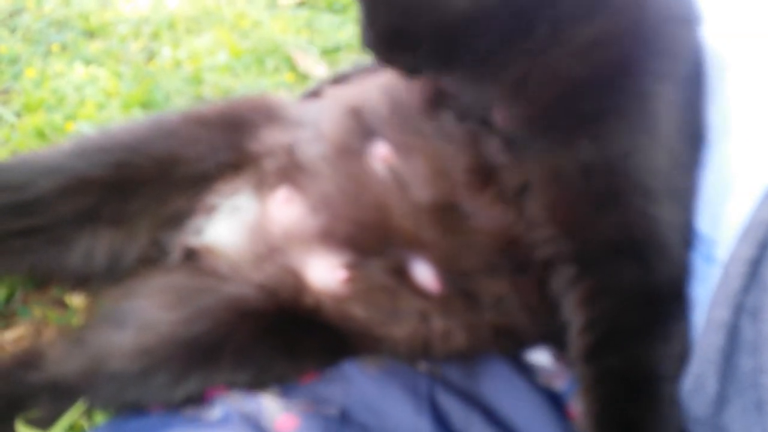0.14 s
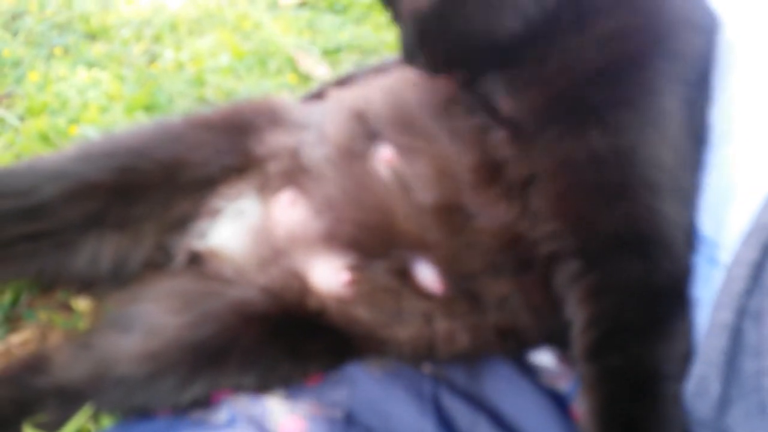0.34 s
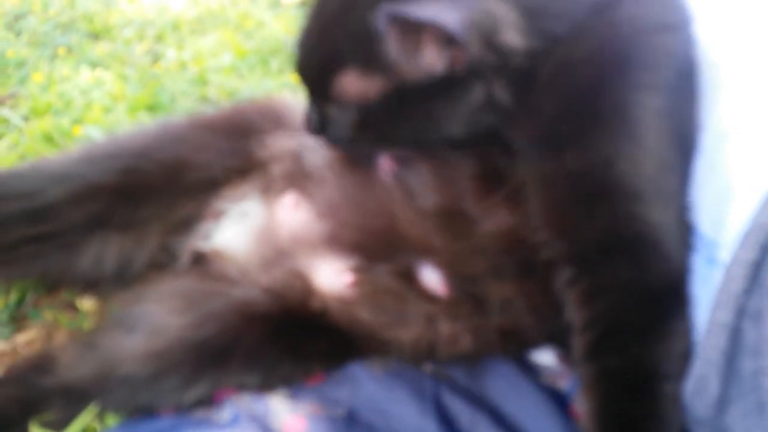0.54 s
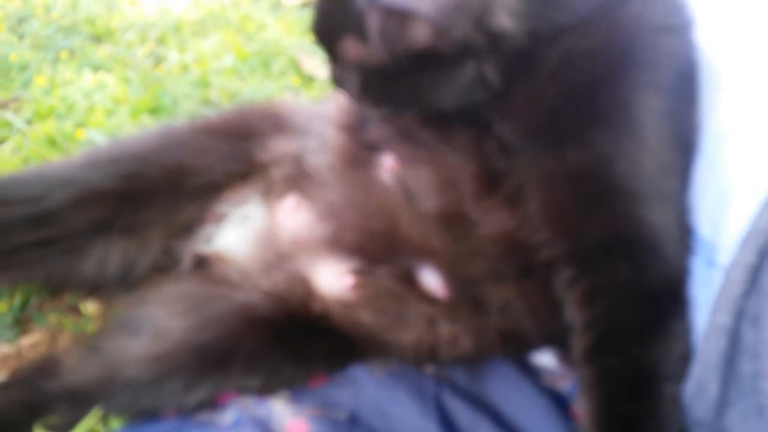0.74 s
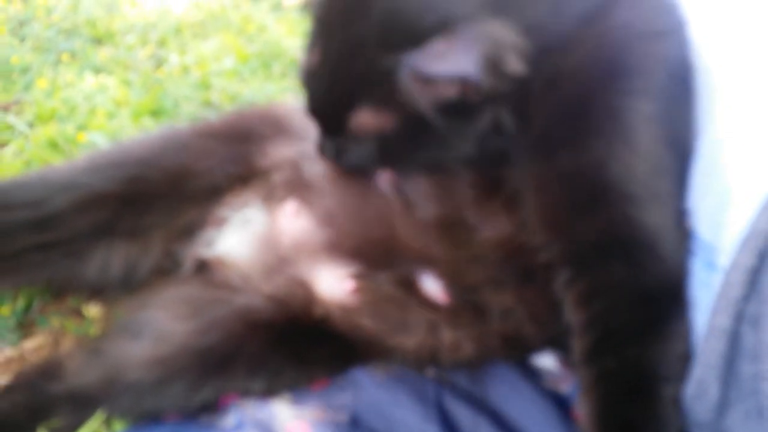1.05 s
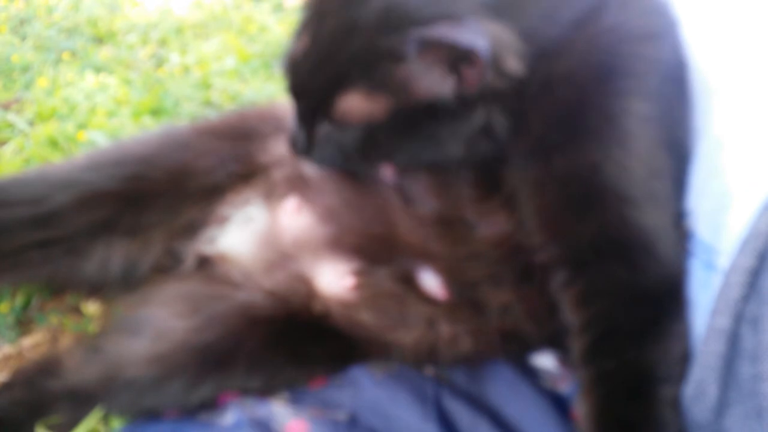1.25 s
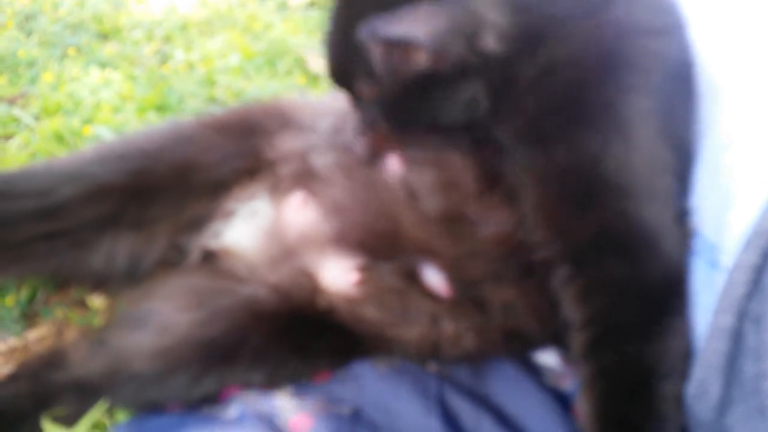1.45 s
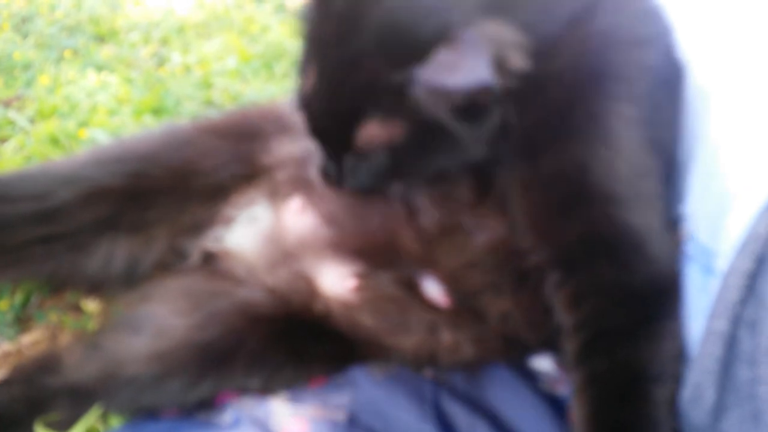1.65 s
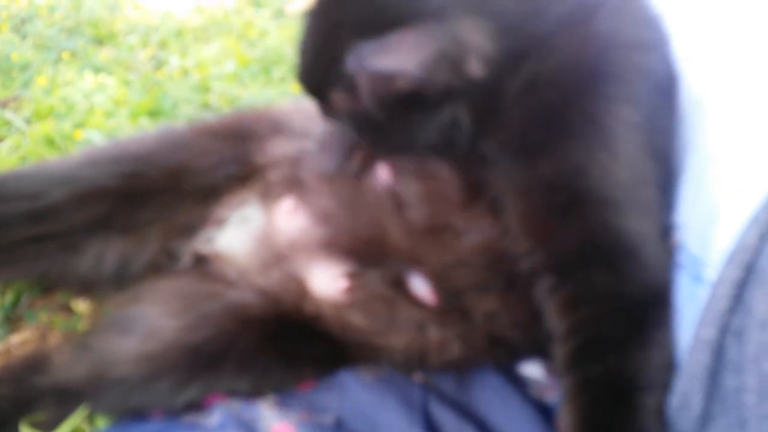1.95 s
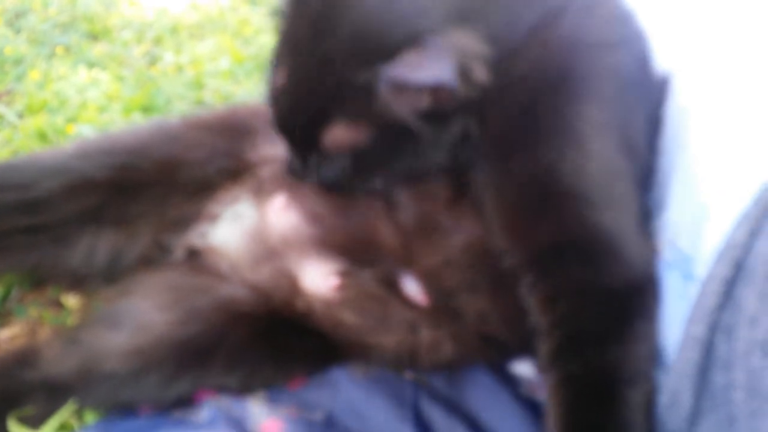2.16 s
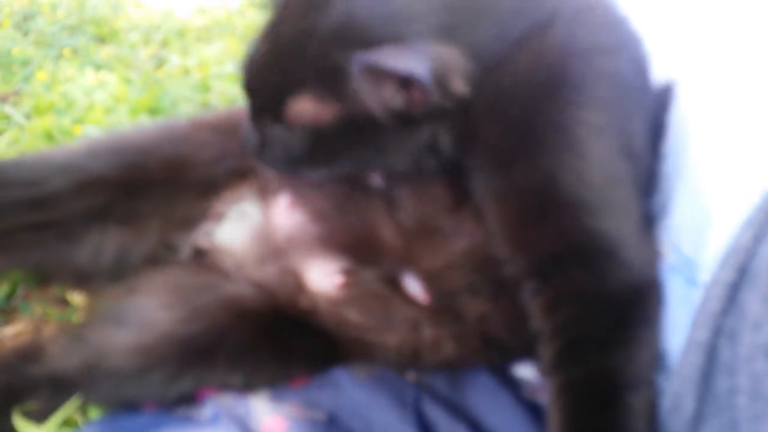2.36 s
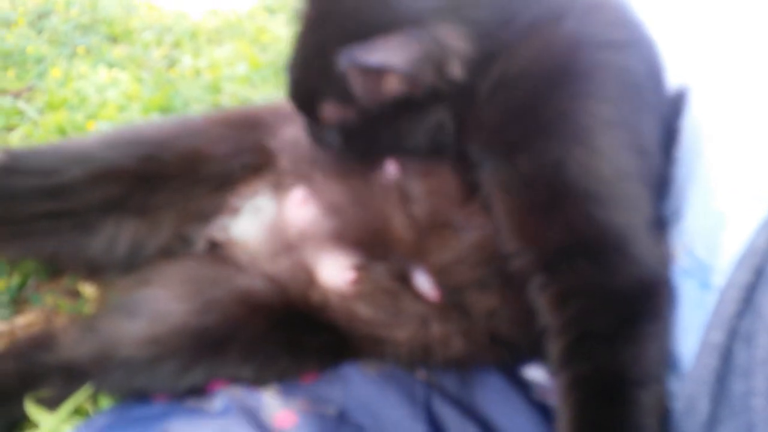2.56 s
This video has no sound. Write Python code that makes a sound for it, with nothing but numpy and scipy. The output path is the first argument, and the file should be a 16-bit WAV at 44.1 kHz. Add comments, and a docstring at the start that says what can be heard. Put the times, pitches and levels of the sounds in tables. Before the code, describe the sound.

A motor with a fan hums low, then revs up to a higher, louder steady roar outdoors

```python
"""A garden outdoors: a motor with a four-bladed fan runs near a small stereo microphone.
It idles, is revved up, overshoots and holds the higher speed. Sines give the blade and shaft tones
and a whine; filtered noise gives the low roar, air hiss, whistle and faint top treble, and bands of
noise swell for a while. Struck resonators give the faint pings of a small piece of metal."""
import sys
import numpy as np
from scipy import signal
from scipy.fft import rfft, irfft, next_fast_len
from scipy.io import wavfile

SR = 44100
rng = np.random.default_rng(int(sys.argv[2]) if len(sys.argv) > 2 else 0)


def elevation(decibels):
    """Turn decibel levels (scalar or array-like) into linear amplitude ratios."""
    levels = np.asarray(decibels, float)
    return 10 ** (levels / 20)


def materialize(psi):
    """Save the field psi as 16-bit PCM at rate SR to the path in sys.argv[1].

    A 1-D psi becomes a single channel; in a 2-D psi each row is a channel.
    """
    bounded = np.clip(np.atleast_2d(psi).T, -1, 1)
    quanta = np.round(bounded * 32767).astype(np.int16)
    wavfile.write(sys.argv[1], SR, quanta)


N = 119070

# motor speed and its two main tones: start_s, blade_hz, blade_db, shaft_db
MOTOR_SPEED = [(0, 182.7, -39.5, -38), (.45, 181, -33, -42), (.8, 186.9, -30.5, -51),
               (1.0, 192.1, -25.5, -67), (1.18, 239.5, -33, -31), (1.33, 266, -36, -30.5),
               (1.48, 254.4, -28.5, -43), (1.8, 254.8, -24.5, -35.5), (2.35, 256, -20, -36),
               (2.6, 258.3, -20.5, -47), (2.7, 252.7, -23, -51)]
# loudness of the motor's noise: start_s, roar_db (before the roar's trim), hiss_db (before its flutter)
MOTOR_LOAD = [(0, -25.5, -48), (.5, -24, -47.5), (1.02, -22.5, -47), (1.3, -17, -40), (1.5, -19, -42.5),
              (1.9, -19, -41), (2.3, -19, -42.5), (2.52, -18.5, -41.5), (2.7, -20, -41.5)]


def rms_one(x):
    """Normalization: divides a signal by its root mean square."""
    return x / np.sqrt(np.mean(x ** 2) + 1e-20)


def in_time(rows):
    """Linear interpolation: turns each column after the times into a curve over the samples."""
    start_s, *columns = np.transpose(rows)
    return [np.interp(np.arange(N) / SR, start_s, column) for column in columns]


def at_hz(points, hz):
    """Spectral envelope: interpolates the second column along log frequency."""
    point_hz, values = np.transpose(points)
    return np.interp(np.log(hz), np.log(point_hz), values)


def pan(db):
    """Interaural level difference: gains for left and right that differ by db, left minus right."""
    return elevation(np.array([[.5], [-.5]]) * db)


def drift(rate_hz):
    """Random modulation: white noise through a two-pole low-pass with equal poles, rms about 1."""
    hop = 40  # samples between computed values
    settle = 2000  # values dropped while the filter settles
    pole = np.exp(-2 * np.pi * rate_hz * hop / SR)
    white = rng.standard_normal(N // hop + settle + 2)
    slow = signal.lfilter([1], [1, -2 * pole, pole * pole], white)[settle:]
    return np.interp(np.arange(N) / hop, np.arange(len(slow)), rms_one(slow))


def stereo_noise(spectrum, left_lead_s=0):
    """Partial coherence: coloured noise alike in both ports in the bass, unrelated in the treble; mid rms 1."""
    # coherence of the two ports: frequency_hz, left_right_likeness (clipped to 0-1 once interpolated)
    likeness = [(60, 0.97), (110, 1), (210, 0.94), (390, 1), (730, 0.67), (1360, 0.08), (2530, 0.19),
                (4730, -1.3), (8820, -0.55)]
    # the two microphone ports differ in colour: frequency_hz, left_minus_right_db
    ports = [(60, 0), (230, 0.4), (400, 3), (600, 2.5), (900, 11.5), (1400, 5), (1900, -0.5), (2400, 2.5),
             (3300, 4), (5000, 2), (6500, 4), (7200, 6), (7900, -5.5), (9600, -13), (11000, 6.5)]
    sign = np.array([[1], [-1]])
    size = next_fast_len(N)
    hz = np.maximum(np.arange(size // 2 + 1) * SR / size, 1)
    mid, side = rfft(rng.standard_normal((2, size)))
    alike = np.clip(at_hz(likeness, hz), 0, 1)
    pair = mid + np.sqrt((1 - alike) / (1 + alike)) * side * sign
    # a time lead is a phase that grows with frequency, shared between the ports
    pair = pair * np.exp(1j * np.pi * hz * left_lead_s * sign)
    colour = elevation(at_hz(spectrum, hz)) * pan(at_hz(ports, hz))
    out = irfft(pair * colour, size)[:, :N]
    return out / np.std(out.mean(axis=0))


def narrow_noise(hz, width_hz, evenness=0):
    """Quadrature modulation: low-passed noise on a carrier makes a band round its pitch; rms 1.
    Evenness (0-1) is the share of the level fluctuation, in dB, that is taken out."""
    sos = signal.butter(2, width_hz / 2, fs=SR, output="sos")
    in_phase, quadrature = signal.sosfilt(sos, rng.standard_normal((2, N)))
    phase = 2 * np.pi * np.cumsum(hz * np.ones(N)) / SR
    band = in_phase * np.cos(phase) + quadrature * np.sin(phase)
    envelope = np.hypot(in_phase, quadrature) + 1e-9
    return rms_one(band / envelope ** evenness)


def tone(hz, db):
    """Phase accumulation: a sine of moving pitch and rms level, with a random starting phase."""
    phase = 2 * np.pi * (np.cumsum(hz) / SR + rng.random())
    return np.sqrt(2) * elevation(db) * np.sin(phase)


def motor_tones():
    """Rotational tones: blades pass at four times the shaft rate; weaker multiples follow the blade tone."""
    # multiples of the shaft rate: multiple
    multiples = [8, 12]
    # their levels: level_db (relative to the blade tone)
    multiple_levels = [-23.5, -30.5]
    blades = 4
    blade_hz, blade_db, shaft_db = in_time(MOTOR_SPEED)
    shaft_hz = blade_hz / blades
    tones = tone(blade_hz, blade_db) + tone(shaft_hz, shaft_db)
    for multiple, level_db in zip(multiples, multiple_levels):
        tones = tones + tone(shaft_hz * multiple, blade_db + level_db)
    return tones * pan(2)


def roar():
    """Turbulence noise: its low spectrum crossfades in power from idle to fast with the speed."""
    # colour at idle: frequency_hz, density_db (relative, per hertz)
    idle_spectrum = [(15, -35), (25, -20), (48, -3.5), (70, -12), (124, -6), (153, -7), (185, -2.5),
                     (249, -12.5), (352, -9), (465, -25), (625, -28), (1600, -38.5), (2080, -79),
                     (3520, -120)]
    # colour at the higher speed: frequency_hz, density_db (relative, per hertz)
    fast_spectrum = [(15, -89), (25, -30), (48, -13), (86, -14), (188, -1), (253, -8.5), (286, -10.5),
                     (358, -7), (449, -12), (625, -20), (670, -24.5), (1490, -38), (2080, -63.5),
                     (3520, -120)]
    trim_db = -1.5
    blade_hz = in_time(MOTOR_SPEED)[0]
    roar_db = in_time(MOTOR_LOAD)[0]
    slowest_hz = blade_hz.min()
    fast_share = np.clip((blade_hz - slowest_hz) / (blade_hz[-1] - slowest_hz), 0, 1)
    idle = np.sqrt(1 - fast_share) * stereo_noise(idle_spectrum, left_lead_s=-0.00021)
    fast = np.sqrt(fast_share) * stereo_noise(fast_spectrum, left_lead_s=.00003)
    return elevation(roar_db + trim_db) * (idle + fast)


def hiss():
    """Broadband flow noise: air hiss under a slight random amplitude modulation."""
    # colour of the hiss: frequency_hz, density_db (relative, per hertz)
    hiss_spectrum = [(800, -33), (1400, -12), (1900, 2), (2320, -4), (3190, -3), (4070, -6), (5630, -6),
                     (6300, -4), (7800, -3.5), (9000, -17), (10000, -25), (11500, -37), (16000, -98)]
    flutter_db = .5 * drift(33.0)  # rate in Hz
    return elevation(in_time(MOTOR_LOAD)[1] + flutter_db) * stereo_noise(hiss_spectrum)


def whistle():
    """Narrow-band noise: a hiss of wandering centre pitch, mostly on the right."""
    # path of the whistle: start_s, centre_hz, level_db
    whistle_path = [(0, 7880, -57), (.3, 8320, -61), (.62, 8200, -61), (.8, 8840, -63), (1.1, 9260, -62.5),
                    (1.2, 7900, -58), (1.38, 7840, -49), (1.55, 7590, -56.5), (2.7, 7670, -53.5)]
    centre_hz, level_db = in_time(whistle_path)
    return elevation(level_db) * narrow_noise(centre_hz, width_hz=520) * pan(-14)


def swells():
    """Amplitude envelopes: each noise band of the motor rises to its peak and falls on a squared sine."""
    # bands: centre_hz, width_hz, left_minus_right_db, start_s, peak_s, end_s, peak_db
    swell_bands = [(200, 50, 0.8, 1.0, 2.08, 3.1, -19), (125, 20, .6, -.3, .2, 0.9, -29),
                   (385, 90, 8, 1.25, 1.58, 2.32, -28), (350, 11, -7, 2.1, 2.4, 3.3, -29.5),
                   (1944, 300, -9, 1.2, 1.66, 1.8, -48), (1850, 200, -7, 1.9, 2.5, 2.8, -49.5),
                   (6170, 250, 9, 1.8, 2.3, 3.1, -48), (3200, 500, 3, .25, .36, .46, -55),
                   (3260, 380, 9, 2.3, 2.55, 2.8, -48), (6940, 960, 8, 1.15, 1.33, 2.5, -48.5)]
    hum_below_hz, hum_evenness = 300, .7  # low bands waver in pitch more than in level
    out, t = 0, np.arange(N) / SR
    for centre_hz, width_hz, pan_db, start_s, peak_s, end_s, peak_db in swell_bands:
        ramp = np.interp(t, [start_s, peak_s, end_s], [0, 1, 0])
        bump = np.sin(np.pi / 2 * ramp) ** 2
        evenness = hum_evenness if centre_hz < hum_below_hz else 0
        band = narrow_noise(centre_hz, width_hz, evenness)
        out = out + elevation(peak_db) * bump * band * pan(pan_db)
    return out


def top_treble():
    """Filtered noise: faint top treble, set to thin out while the roar is loud."""
    # colour of the top treble: frequency_hz, density_db (relative, per hertz)
    treble_spectrum = [(6000, -18), (9000, -11), (11000, 4.5), (12500, 0), (16000, -18.5)]
    mean_level_db = -67
    roar_db = in_time(MOTOR_LOAD)[0]
    level_db = mean_level_db - (roar_db - roar_db.mean())
    return elevation(level_db) * stereo_noise(treble_spectrum)


def pings():
    """Modal synthesis: each touch excites the decaying modes of the metal with strengths of its own."""
    # touches: start_s, level_db, brightness_db_per_octave (pivoting on the second mode)
    touches = [(.15, -61, -3), (.52, -57, -4), (.875, -51.5, 9), (1.3, -52, -6.5)]
    # modes of the metal: frequency_hz
    mode_pitches = [2765, 4030, 4970, 5920]
    # strengths of the modes: level_db (relative to the touch, before its brightness and chance)
    mode_levels = [5, -1.5, -4, -7]
    t60_s = 0.3  # time to decay by 60 dB
    start_s, touch_db, bright_db = np.transpose(touches)
    chance_db = rng.normal(0, 1, (len(touches), len(mode_pitches)))
    radius = elevation(-60 / (t60_s * SR))
    out = np.zeros(N)
    for k, (hz, mode_db) in enumerate(zip(mode_pitches, mode_levels)):
        tilt_db = bright_db * np.log2(hz / mode_pitches[1])
        clicks = np.full(N, 1e-18)  # a tiny floor keeps the resonator off denormal numbers
        clicks[(start_s * SR).astype(int)] = elevation(touch_db + mode_db + tilt_db + chance_db[:, k])
        angle = 2 * np.pi * hz / SR
        resonator = [1, -2 * radius * np.cos(angle), radius * radius]
        out += signal.lfilter([0, np.sin(angle)], resonator, clicks)
    return out * pan(3.5)


def whine():
    """Pure tone: the motor's higher tone under load, a single sine."""
    # path of the whine: start_s, pitch_hz, level_db
    whine_path = [(0, 617, -89), (1.4, 628.3, -62), (1.55, 623.7, -37.5), (2.1, 619.3, -43),
                  (2.4, 627, -37), (2.6, 612, -47), (2.7, 648, -47)]
    return tone(*in_time(whine_path)) * pan(3.2)


def scene():
    """Superposition: the pressures of all the sounds add."""
    motor = motor_tones() + roar() + swells() + whine()
    treble = hiss() + whistle() + top_treble()
    return motor + treble + pings()


def low_pass(x):
    """Removes everything above the highest recorded frequency."""
    return signal.sosfilt(signal.butter(12, 14300, fs=SR, output="sos"), x)


def record(dry):
    """High-pass response: the microphone cuts the deepest bass; both ends fade briefly."""
    bass_cut_hz, fade_s = 43, .008
    high_pass = signal.butter(2, bass_cut_hz, "high", fs=SR, output="sos")
    heard = signal.sosfilt(high_pass, dry)
    to_nearest_end = np.minimum(np.arange(N), np.arange(N)[::-1])
    edge = np.minimum(to_nearest_end / (fade_s * SR), 1)
    finished = heard * np.sin(np.pi / 2 * edge) ** 2
    return low_pass(finished)


dry = scene()
out = record(dry)
materialize(out)
```